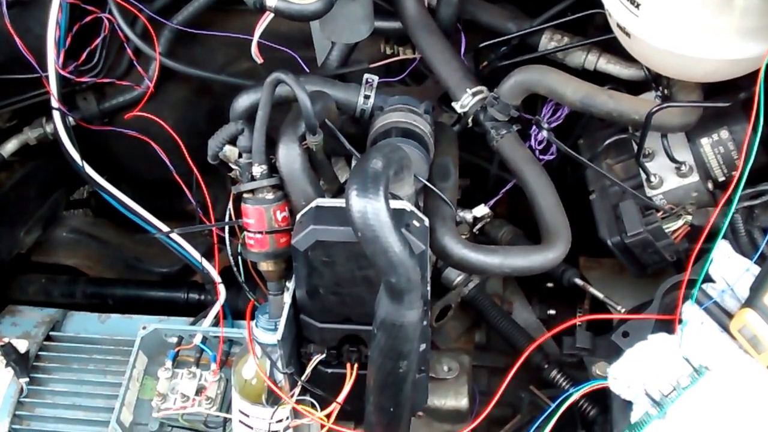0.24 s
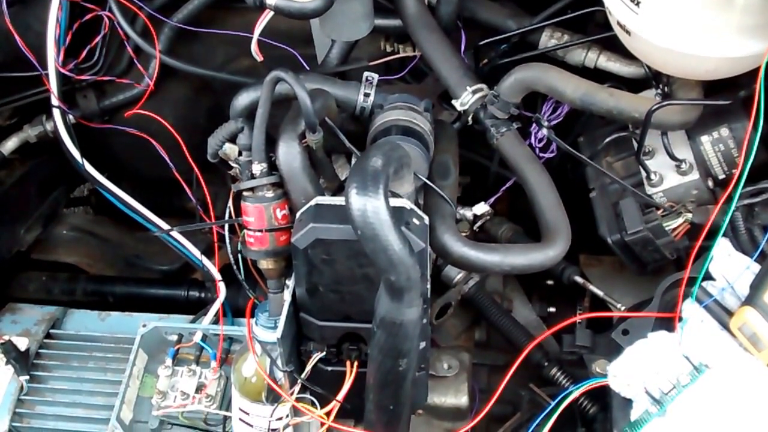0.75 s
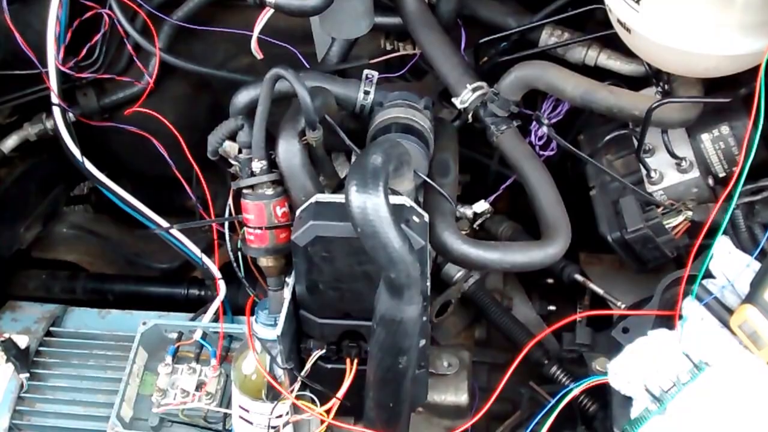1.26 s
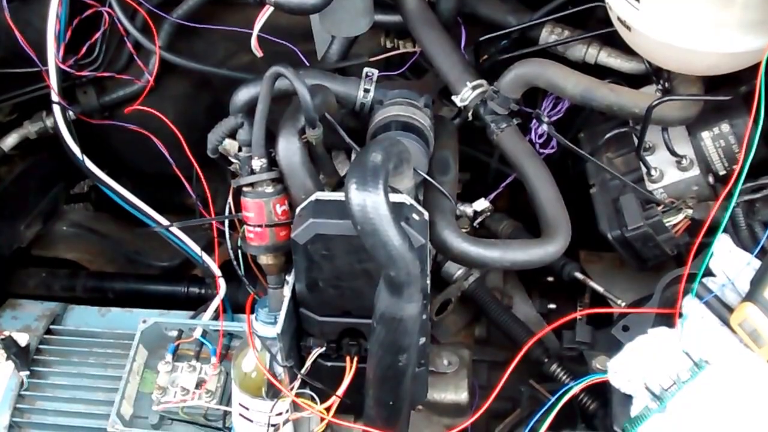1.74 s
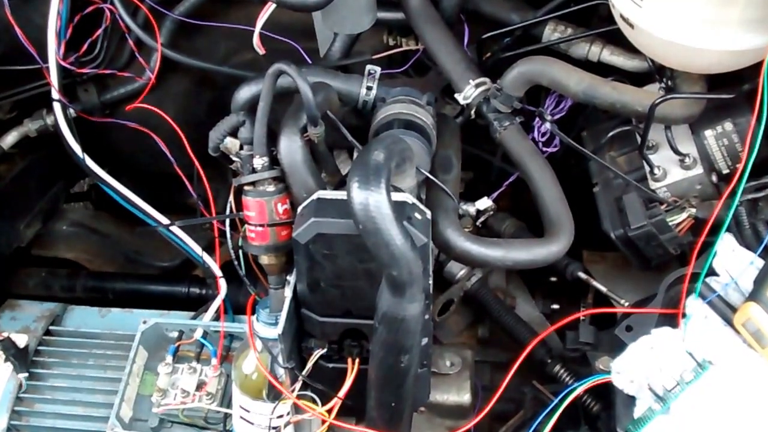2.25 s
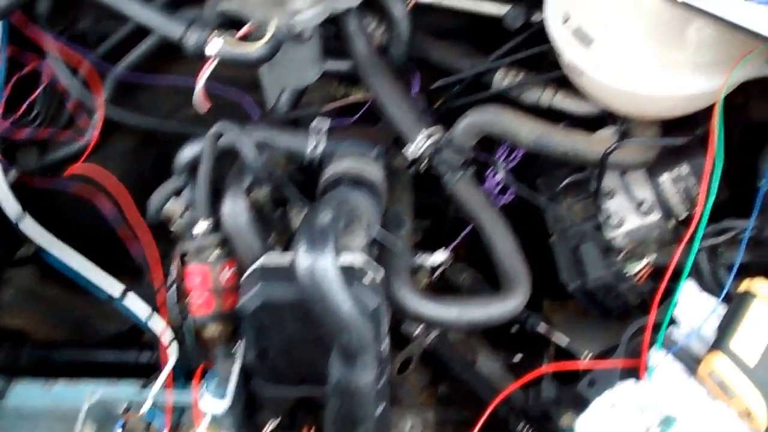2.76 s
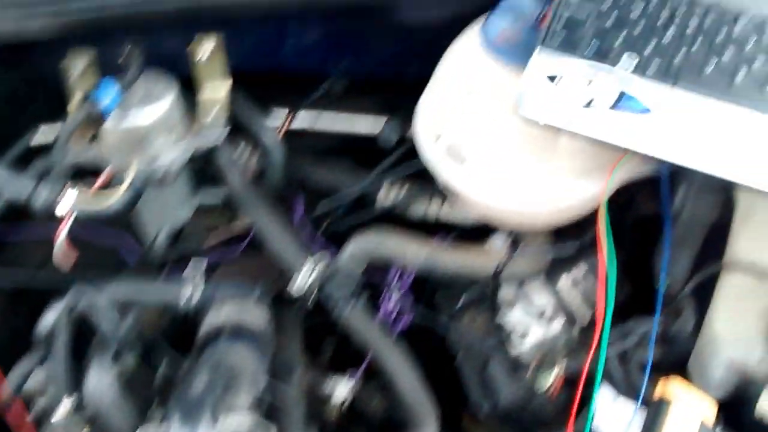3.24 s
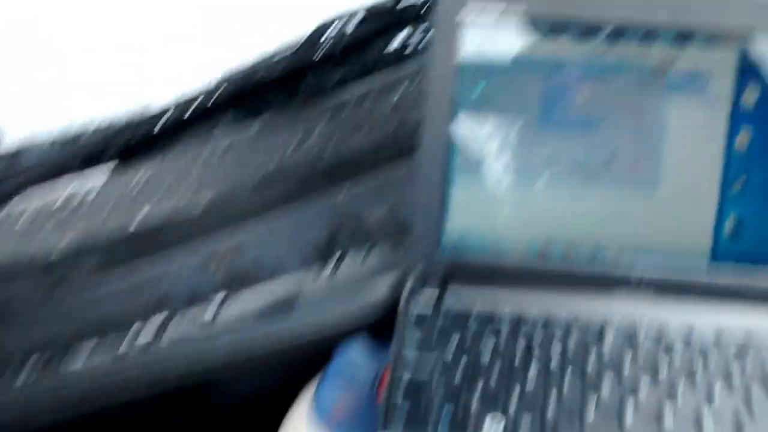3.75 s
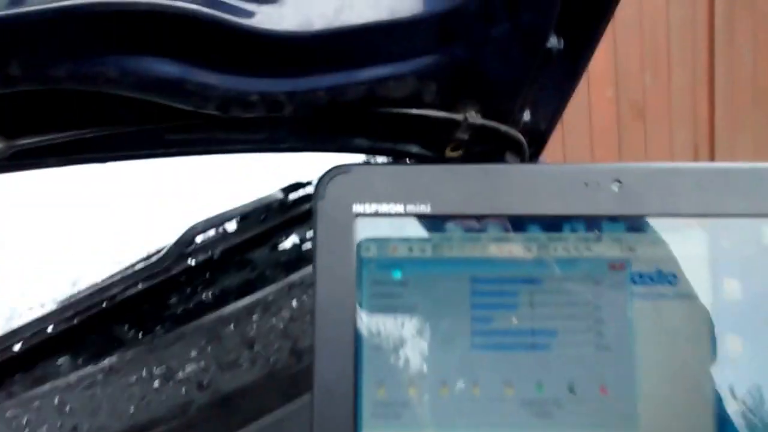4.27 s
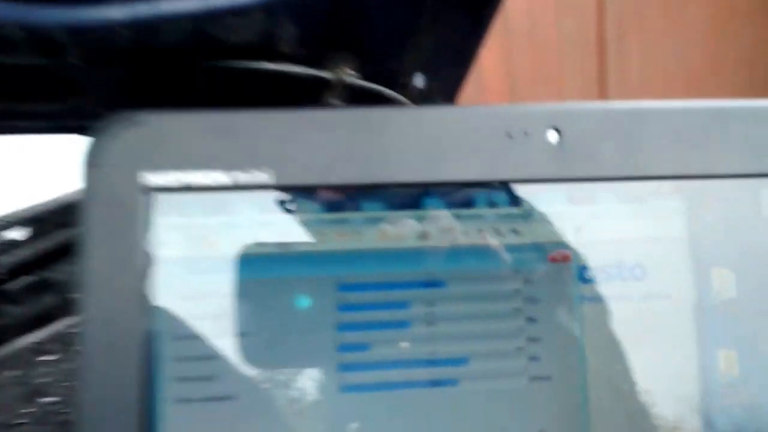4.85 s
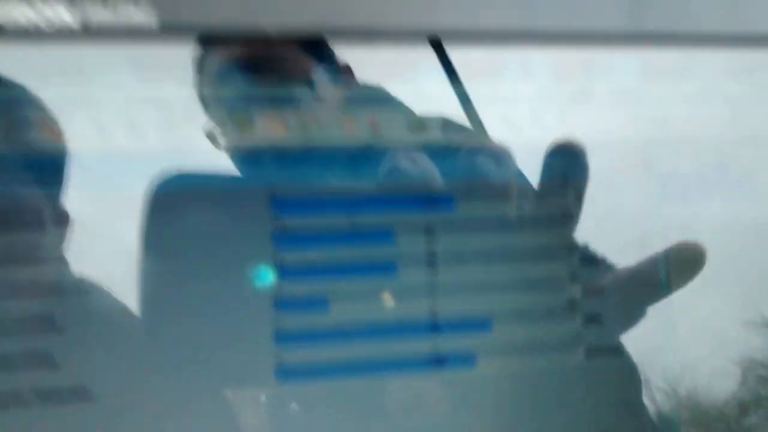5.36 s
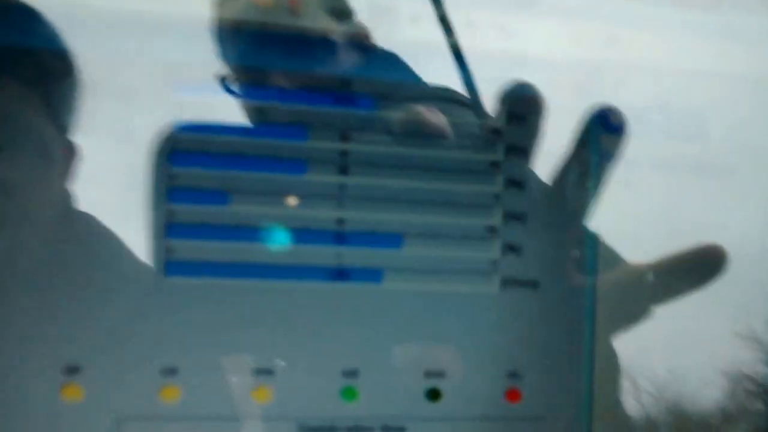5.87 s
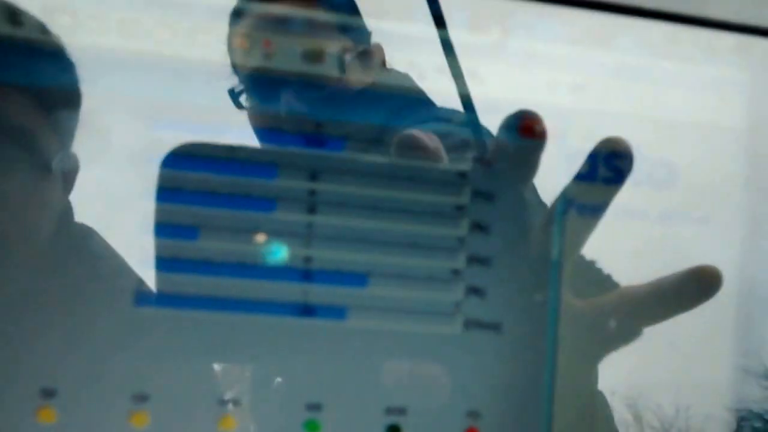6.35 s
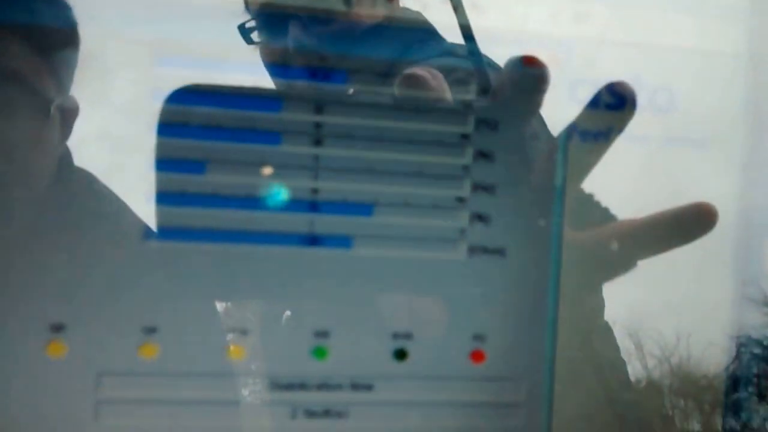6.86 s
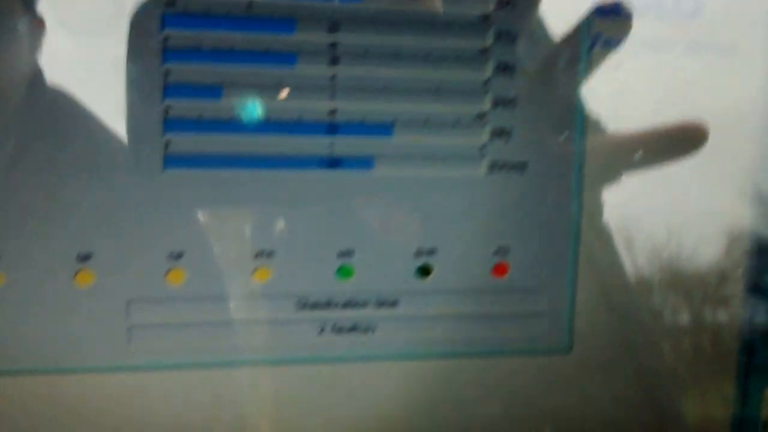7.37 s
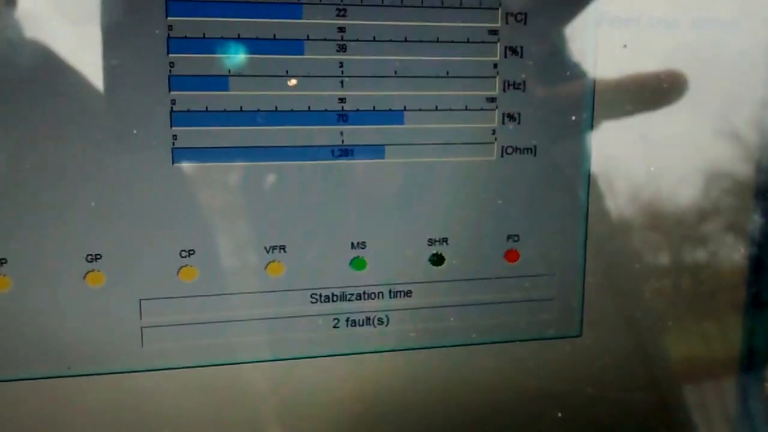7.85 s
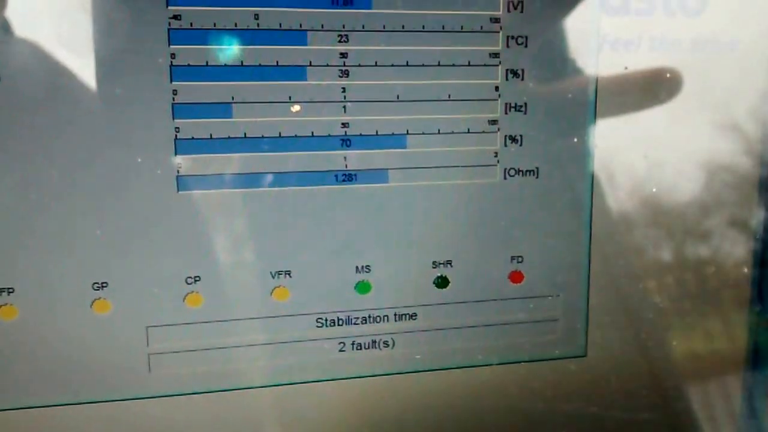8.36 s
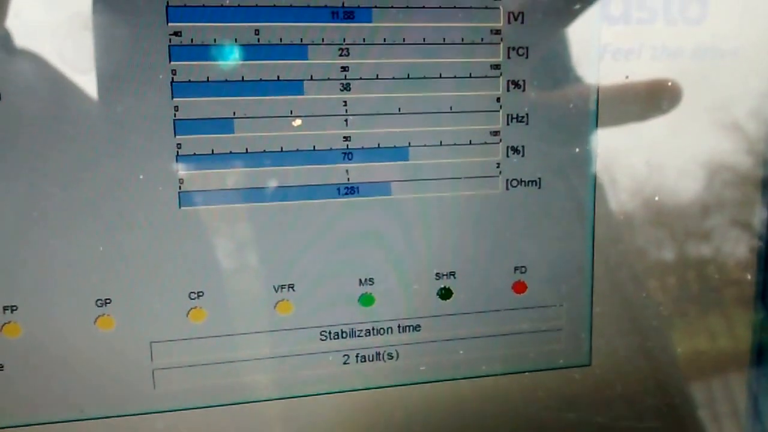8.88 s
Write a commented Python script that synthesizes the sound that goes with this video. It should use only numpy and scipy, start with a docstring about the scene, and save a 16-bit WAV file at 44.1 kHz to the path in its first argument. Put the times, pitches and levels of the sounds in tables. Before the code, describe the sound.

A diesel heater struggles to light, its exhaust pipe hooting in uneven low bursts with puffing flares over steady blower hiss and motor whine.

```python
"""In an open engine bay a diesel heater tries to light: its unsteady flame makes the exhaust pipe hoot in bursts.
The hoot is a near sine with swelling loudness; each flare of the flame is puffing noise around a small pop.
Shaped noise makes the blower's hiss and whistles and the wind on the microphone; steady sines make the motor whine.
The microphone swings from the heater to a spot beside it, which changes levels, tone colour and left-right balance.
Fingers tick on the casing, a thin high whistle and a squeak are heard, and a small bird trills once."""
import sys
import numpy as np
from scipy import signal
from scipy.fft import rfft, irfft, next_fast_len
from scipy.io import wavfile
from scipy.ndimage import uniform_filter1d

SR = 44100
rng = np.random.default_rng(int(sys.argv[2]) if len(sys.argv) > 2 else 0)


def store_wav(level_fs):
    """Save 16-bit WAV to argv[1]."""
    pcm = np.round(np.clip(np.atleast_2d(level_fs), -1, 1) * 32767)
    wavfile.write(sys.argv[1], SR, pcm.T.astype(np.int16))


def ratio(d):
    """dB to gain"""
    e = np.asarray(d, float) / 20
    return 10 ** e


N = 401751   # length in samples

# the microphone turns off the heater, then moves beside it: time_s, turned (0-1), moved (0-1)
SWING = [(0, 0.03, 0.05), (2.5, 0, 0.08), (3.4, 0.33, 0.15), (4.2, 0.95, 0.05), (5.0, 0.98, 0.81),
         (9.11, 1, 1)]
# left-right balance of noise over the heater: pitch_hz, left_minus_right_db
LEAN_OVER = [(60, 3), (150, 1.5), (380, 2), (950, 0.5), (2380, -7), (5980, -3), (15000, 4.5)]
# how far the left side runs ahead in noise: pitch_hz, left_lead_radians
LEAD = [(0, 0.5), (1460, -0.5), (2760, -4), (3360, -5.5), (4050, -5), (4650, -7), (5170, -8.5),
        (5860, -10.5), (6550, -17.5), (7320, -27), (9990, -23), (11500, -13), (15500, -22.5)]
TURNS_HZ = 49.35   # turning rate of the blower

SIZE = next_fast_len(N)
HZ = np.maximum(np.arange(SIZE // 2 + 1) * SR / SIZE, 1)
LEFT_LEAD = np.interp(HZ, *np.transpose(LEAD))


def rms_one(x):
    """Scale to an rms of 1."""
    return x / np.sqrt(np.mean(x ** 2) + 1e-20)


def in_time(rows):
    """Turn rows that begin with a time into one smooth curve per remaining column."""
    s, *columns = np.transpose(rows)
    return [np.interp(np.arange(N) / SR, s, c) for c in columns]


def swing():
    """How far the microphone has turned off the heater and moved beside it, each 0 to 1."""
    return np.clip(in_time(SWING), 0, 1)


def at_hz(points, hz):
    """Read a curve of (pitch, value) points along a logarithmic pitch scale."""
    pitch_hz, value = np.transpose(points)
    return np.interp(np.log(hz), np.log(pitch_hz), value)


def between(start, end, share):
    """Blend from start to end."""
    return start + (end - start) * share


def drift(rate_hz):
    """Slow chance: noise twice through a one-pole low-pass, made at a twentieth of the sample rate; rms 1."""
    r = np.exp(-40 * np.pi * rate_hz / SR)
    slow = signal.lfilter([1], [1, -2 * r, r * r], rng.standard_normal(N // 20 + 4002))[4000:]
    return np.interp(np.arange(N) / 20, np.arange(len(slow)), rms_one(slow))


def band(x, low_hz, high_hz):
    """Keep what lies between two pitches."""
    return signal.sosfilt(signal.butter(2, [low_hz, high_hz], "band", fs=SR, output="sos"), x)


def place(x, lean_db, lag=12):
    """Place a point source: lag samples later on the left, and lean_db louder there."""
    return np.array([np.roll(x, lag) * ratio(lean_db / 2), x * ratio(-lean_db / 2)])


def noise(colour_db, lean_db, alike, lead, white=None):
    """Stereo noise spectra: a shared part, shifted in phase on the left, and a part of each side's own."""
    if white is None:
        white = rng.standard_normal((3, SIZE))
    shared, left, right = rfft(white)
    alike = np.clip(alike, 0, 1)
    ahead = np.exp(1j * lead)
    pair = np.sqrt(alike) * shared * [ahead, ahead ** 0]
    pair = pair + np.sqrt(1 - alike) * np.array([left, right])
    return pair * ratio(colour_db + np.outer([.5, -.5], lean_db))


def sound(spectrum, low_hz, high_hz):
    """Turn spectra into sound, scaled so that the average of the two sides has rms 1 within a band."""
    inside = (HZ > low_hz) & (HZ < high_hz)
    power = 2 * np.sum(abs(spectrum.mean(axis=0)[inside]) ** 2)
    return irfft(spectrum, SIZE)[:, :N] * SIZE / np.sqrt(power)


def hoot():
    """The flame drives the pipe in round swells: a near sine, sharper while growing, with overtones when loud."""
    # swells while the flame holds: top_s, top_db, rise_s, fall_s
    hoots = [(0.019, -8.5, 0.058, 0.029), (0.09, -12.5, 0.05, 0.049), (0.159, -19.5, 0.023, 0.03),
             (0.524, -10.5, 0.082, 0.051), (0.6, -13.5, 0.022, 0.036), (0.654, -12, .05, 0.072),
             (0.759, -9.5, 0.061, 0.045), (0.806, -10, 0.023, 0.11), (0.909, -10, 0.15, 0.07),
             (1.45, -7.5, 0.075, 0.062), (1.54, -10.5, .07, 0.033), (1.887, -7.5, 0.044, 0.097),
             (1.96, -9, 0.095, 0.041), (2.37, -8, .1, 0.1), (2.579, -18.5, .07, 0.039),
             (2.67, -18, .04, 0.015), (2.734, -9, 0.055, 0.041), (2.795, -7.5, 0.027, 0.059),
             (2.849, -9.5, 0.033, 0.047), (3.13, -14, 0.11, 0.077), (3.24, -9, 0.18, 0.1),
             (3.82, -10, 0.057, 0.099), (4.051, -10.5, 0.24, .11), (4.21, -14, 0.053, 0.061),
             (4.35, -10, 0.12, 0.047), (4.433, -11.5, 0.049, 0.044), (4.84, -15.5, 0.083, .05),
             (4.984, -11.5, 0.069, 0.11), (5.343, -14.5, 0.12, 0.1), (5.491, -14, 0.076, 0.052),
             (5.82, -13, 0.025, 0.11), (5.96, -14.5, 0.11, 0.085), (6.132, -15, 0.12, 0.062),
             (6.28, -14, 0.17, 0.056), (6.685, -18, 0.048, .08), (6.77, -13, .03, 0.075),
             (7.002, -11, 0.086, .15), (7.36, -13.5, 0.11, 0.043), (7.822, -12.5, 0.081, 0.13),
             (8.061, -21, 0.023, 0.065), (8.147, -12.5, 0.051, 0.1), (8.262, -24, 0.025, 0.074),
             (8.6, -13.5, 0.073, 0.15), (8.793, -12.5, 0.05, 0.1), (9.029, -16.5, 0.081, 0.24)]
    pipe_hz = 228.06
    rise_roundness, fall_roundness = 1.38, 1.92
    t = np.arange(N) / SR
    power = ratio(-35.5 + 3 * drift(10.3)) ** 2   # the pipe's murmur between hoots
    for s, top_db, rise, fall in hoots:
        near = slice(max(round((s - rise) * SR), 0), round((s + fall) * SR))
        rising = t[near] < s
        off = np.where(rising, (s - t[near]) / rise, (t[near] - s) / fall)
        roundness = np.where(rising, rise_roundness, fall_roundness)
        power[near] += (ratio(top_db) * (1 - np.clip(off, 0, 1) ** roundness)) ** 2
    level_db = uniform_filter1d(10 * np.log10(power), size=450)
    growth = uniform_filter1d(np.gradient(level_db) * SR, size=2000)   # dB a second
    hz = pipe_hz + 3.03 * np.tanh(growth / 150) + 3.3 * drift(9.93)
    phase = 2 * np.pi * np.cumsum(hz) / SR
    size = np.sqrt(2) * ratio(level_db + 1.15 * drift(20) + 0.4 * drift(83))
    turned, moved = swing()
    pair = phase + [between(-0.6, -0.054, moved), 0 * t]   # radians by which left leads
    overtones = np.sin(2 * pair + 1.4) + 0.49 * np.sin(3 * pair) + 0.63 * np.sin(4 * pair)
    overtone_size = 0.04 * size ** 2 * ratio(9.2 * np.tanh(drift(31)))
    tone = size * np.sin(pair) + overtone_size * overtones
    lean_db = between(1.74, 5, turned)
    return tone * ratio(np.outer([.5, -.5], lean_db)), phase


def flares(phase):
    """Flares swell fast and die slower around small pops, roaring in puffs on the pipe's cycle; a few dull clicks."""
    # fuel catches and flares: top_s, level_db (of each swell alone, before the puffs)
    catches = [(0.009, -40.5), (0.524, -42.5), (0.805, -39.5), (1.429, -36), (1.462, -43), (1.876, -35),
               (2.365, -39), (2.789, -35), (3.196, -38.5), (3.793, -39), (4.809, -38.5), (4.954, -41.5),
               (5.295, -37), (5.451, -37.5), (5.817, -34.5), (6.257, -36.5), (6.763, -33.5), (7.004, -31),
               (7.327, -36.5), (7.778, -34.5), (8.149, -35), (8.58, -37), (8.774, -33)]
    # tone colour of the roar: pitch_hz, level_db (per Hz; only the shape counts)
    flare_colour = [(190, -12.5), (320, -2), (390, -20.5), (490, -14), (1040, -28), (1280, -19.5),
                    (2540, -60.5), (3290, -30.5), (6000, -53), (7800, -87.5)]
    # short dull clicks: start_s, peak_db (the loudest sets the scale)
    click_rows = [(.8014, -19), (2.7864, -19), (2.7994, -18), (7.776, -18)]
    rise_s, fall_s = 0.019, 0.048
    pop_db = 11   # peak of the largest pop above the level of the largest flare
    marks = np.zeros(N)
    for s, level_db in catches:
        marks[round(s * SR)] = ratio(level_db)
    before = 2600   # samples of swell ahead of each top
    t = np.arange(-before, 13000) / SR
    shape = np.where(t < 0, np.exp(t / rise_s), np.exp(-t / fall_s))
    swell = signal.fftconvolve(marks, shape)[before:][:N]
    puffs = (1 + .5 * np.cos(phase - .6)) * ratio(1.6 * np.tanh(drift(53)))
    roar = sound(noise(at_hz(flare_colour, HZ), at_hz(LEAN_OVER, HZ), 0.98, LEFT_LEAD), 343, 1800)

    pop = band(marks + 1e-18, 360, 910)
    pop = ratio(pop_db) * pop / abs(pop).max() * marks.max()
    clicks = np.zeros(N) + 1e-18
    for s, peak_db in click_rows:
        clicks[round(s * SR)] = ratio(peak_db)
    dull = band(band(clicks, 400, 1900), 300, 2200)
    dull = dull / abs(dull).max() * clicks.max()
    return place(pop + dull, 0.93) + swell * puffs * roar, swell


def air(swell):
    """Burner roar, duct whistle, blower hiss, fizz and wind from noise; flares lift the whistles, hiss and fizz."""
    # air at the moving microphone before flares lift it: time_s, hiss_db, duct_whistle_db
    air_levels = [(0, -54, -54.5), (0.5, -52.5, -54), (2.0, -52.5, -57), (2.9, -53.5, -53.5),
                  (3.75, -51.5, -57.5), (4.2, -48, -47), (4.85, -44.5, -45), (5.6, -44.5, -55),
                  (6.6, -48.5, -60), (7.4, -47, -63.5), (9.11, -47.5, -52)]
    # noise colour over the heater: pitch_hz, level_db (per Hz; only the shape counts)
    over_colour = [(59, -49.5), (100, -18), (173, -14.5), (238, -4), (370, -27), (898, -28), (1110, -34),
                   (1230, -31.5), (1760, -38.5), (2000, -30.5), (2580, -29), (3850, -32), (9950, -55),
                   (11300, -48.5), (15500, -63)]
    # noise colour beside the heater: pitch_hz, level_db (per Hz; only the shape counts)
    beside_colour = [(59, -53.5), (100, -10.5), (228, -8), (429, -12), (917, -23), (1040, -30.5),
                     (1260, -26), (1800, -42), (2500, -41.5), (2870, -45.5), (3250, -38), (5400, -48.5),
                     (6810, -50.5), (7410, -56.5), (12000, -54), (15500, -66)]
    # left-right balance beside the heater: pitch_hz, left_minus_right_db
    lean_beside = [(60, 2.5), (150, 18), (380, 0), (950, 5), (2380, -8.5), (5980, -5), (15000, 9.5)]
    # resonances of housing and ducts: pitch_hz, width_hz, boost_over_db, boost_beside_db
    body = [(280.4, 29, 2.5, 9), (433, 2.9, 12, -4), (520, 5, 8.5, -1), (610, 3.7, 10, 0),
            (880, 34, 2.5, 6.5), (3080, 22, 4, 12.5), (3310, 70, 3, 6), (11800, 300, 5, 6),
            (3924, 180, 7, 7), (6760, 270, 4.5, 6)]
    # how alike the two sides are: pitch_hz, likeness (0-1)
    likeness = [(100, 1), (250, 0.66), (450, 0.37), (1200, 1), (1800, 0.7), (2600, 0.93), (6000, 0.3),
                (10000, 0.95), (15000, 0.06)]
    # rumble of wind on the microphone: pitch_hz, level_db (per Hz; only the shape counts)
    wind_colour = [(30, -12), (90, -9.5), (190, -9), (300, -55)]
    hiss_db, duct_db = in_time(air_levels)
    moved = swing()[1]
    hiss_swing_db = hiss_db + 51
    # each: level over and beside the heater, plus a share of the hiss's swing
    roar_db = between(-44, -42.5, moved) + 0.28 * hiss_swing_db
    fizz_db = between(-61, -67, moved) + 0.95 * hiss_swing_db
    wind_db = between(-44, -39, moved) + 0.066 * hiss_swing_db

    # shares of power below 1800 Hz and above 5500 Hz
    low, high = 1 / (1 + (HZ / 1800) ** 8), 1 / (1 + (5500 / HZ) ** 8)
    turns = np.arange(SIZE) * TURNS_HZ / SR
    roar, hiss, fizz = 0, 0, 0
    spots = [(over_colour, LEAN_OVER, 1 - moved), (beside_colour, lean_beside, moved)]
    for k, (colour, lean, share) in enumerate(spots):
        white = rng.standard_normal((3, SIZE))
        # part of the noise repeats on every turn
        one_turn = rng.standard_normal(900)
        white[0] += 0.11 * band(one_turn[(turns % 1 * 900).astype(int)], 2200, 4600)
        peaks = 0
        for row in body:
            hz, width_hz, boost_db = row[0], row[1], row[2 + k]
            peaks = peaks + (ratio(boost_db) ** 2 - 1) / (1 + (2 * (HZ - hz) / width_hz) ** 2)
        both = noise(at_hz(colour, HZ), at_hz(lean, HZ), at_hz(likeness, HZ), LEFT_LEAD, white)
        both = both * np.sqrt(np.maximum(1 + peaks, .01))
        roar = roar + np.sqrt(share) * sound(both * np.sqrt(low), 363, 950)
        hiss = hiss + np.sqrt(share) * sound(both * np.sqrt((1 - low) * (1 - high)), 2200, 5000)
        fizz = fizz + np.sqrt(share) * sound(both * np.sqrt(high), 6060, 14000)

    # whistles are noise narrowed around one pitch; the upper one belongs beside the heater
    duct = noise(0, -1.5 + 0 * HZ, 1.0, LEFT_LEAD) / (1 + ((HZ - 1255) / 60) ** 2)
    duct = ratio(duct_db + 1.9 * drift(9.7)) * sound(duct, 1180, 1700)
    upper = noise(0, -4.0 + 0 * HZ, 1.0, LEFT_LEAD) / (1 + ((HZ - 3310) / 30) ** 2)
    upper = ratio(hiss_db - 8.5) * sound(upper, 3000, 3600) * moved ** 2

    turn = 2 * np.pi * turns[:N]
    throb = 1 + 0.06 * np.cos(turn) + 0.066 * np.cos(2 * turn + 1.4)   # brushes rub once a turn
    blower = throb * (ratio(hiss_db + 0.73 * drift(11.0)) * hiss + ratio(fizz_db) * fizz)
    roar = ratio(roar_db + 1.0 * drift(18)) * roar
    wind_lean_db, wind_lead = np.clip(HZ / 3.1 - 5, 0, 9), np.clip(4.5 - HZ / 20, 0, 3)
    wind = sound(noise(at_hz(wind_colour, HZ), wind_lean_db, 0.56, wind_lead), 25, 120)
    wind = ratio(wind_db + 2.2 * drift(5.0)) * wind
    lifted = (1 + 150 * swell) * duct + (1 + 18 * swell) * blower + (1 + 160 * swell) * upper
    return roar + lifted + wind


def motor():
    """The drive whines at a fixed pitch, beating with the turns; blower tones waver with the speed."""
    # whine at the moving microphone, before it wavers: time_s, first_db, left_minus_right_db, third_harmonic_db
    whine_levels = [(0, -52, -3.5, -64.5), (2.4, -51.5, -7.5, -63), (3.2, -50.5, -11.5, -63.5),
                    (3.7, -56, -8.5, -59), (3.95, -53.5, -5.5, -61), (5.7, -51.5, 4.5, -58),
                    (6.6, -54, 6, -76), (7.6, -54, 4.5, -57), (9.11, -54, 7.5, -58.5)]
    # blower tones before they waver: multiple of the turning rate, peak_over_db, peak_beside_db
    orders_of_turn = [(16, -54, -60), (19, -53.5, -53), (60, -62, -70), (64, -66, -60), (67, -66, -59),
                      (76, -68, -60), (79, -62, -59)]
    whine_hz = 1964.4
    first_db, lean_db, third_db = in_time(whine_levels)
    turned, moved = swing()
    # facing the heater, then turned off it: radians by which left leads, and left minus right dB
    lead, third_lead = between(-0.9, 2.6, turned), between(-0.59, -5.5, turned)
    third_lean_db = between(0, -2.5, turned)
    t = np.arange(N) / SR
    first = 0
    for k, size in enumerate([1, .22, .24]):   # the whine and neighbours one and two turning rates above
        first = first + size * np.sin(2 * np.pi * (whine_hz + k * TURNS_HZ) * t + [lead, 0 * t])
    third = np.sin(6 * np.pi * whine_hz * t + [third_lead, 0 * t])
    first = ratio(first_db + 1.0 * drift(8.0) + np.outer([.5, -.5], lean_db)) * first
    third = ratio(third_db + 2.0 * drift(2.8) + np.outer([.5, -.5], third_lean_db)) * third
    whine = np.sqrt(2) * (first + third)

    turns = TURNS_HZ * (t + np.cumsum(0.0028 * drift(6)) / SR)
    orders = 0
    for k, over_db, beside_db in orders_of_turn:
        level = ratio(between(over_db, beside_db, moved) + 4.1 * drift(3.3))
        orders = orders + level * np.sin(2 * np.pi * (k * turns + rng.random()))
    return whine + orders * ratio([[-2.5], [2.5]])   # blower tones lean to the right


def ticks():
    """Dry snaps, each a tiny burst of noise, with a dull knock of the casing; faint crackles as the grip shifts."""
    # fingers on the casing: start_s, snap_peak_db, knock_db (scales the knock), left_minus_right_db
    taps = [(5.453, -31, -27, -8), (5.604, -31, -24, -8.5), (5.8321, -9, -18, -7), (5.9285, -22, -20, -5),
            (5.9691, -21, -20, -6), (6.094, -15, -11, -7)]
    # ringing of the casing: pitch_hz, level_db (relative), decay_s (to fall 60 dB)
    casing = [(900, -2, .005), (1900, 0, .004), (4400, 1, .0025), (6500, -1, .002)]
    rustle_start_s, rustle_end_s, rustles_per_s, rustle_db = 5.38, 5.8, 90, -41
    out, t = np.zeros((2, N)), np.arange(600) / SR
    for s, snap_db, knock_db, lean_db in taps:
        burst = np.roll(rng.choice([-1, 1], len(t)) * ratio(-60 * t / .001), 14)
        snap = band(burst, 600, 12000)
        snap = ratio(snap_db) * snap / abs(snap).max()
        knock = sum(ratio(db - 60 * t / decay_s) * np.sin(2 * np.pi * hz * t) for hz, db, decay_s in casing) / 2
        knock = ratio(knock_db) * np.roll(knock, 14)
        at = round(s * SR) + 20
        out[:, at:at + len(t)] += place(snap + knock, lean_db, lag=18)
    now = np.arange(N) / SR
    born = (rng.random(N) < rustles_per_s / SR) & (now > rustle_start_s) & (now < rustle_end_s)
    strength = ratio(rustle_db + 4.2 * np.minimum(rng.exponential(1, N), 4))
    crackle = band(born * strength + 1e-18, 7500, 13000)
    return out + place(crackle, -9.5)


def peep():
    """A thin high whistle beside the heater: a near sine that wavers in pitch and level."""
    # before it wavers: time_s, pitch_hz, level_db
    peep_rows = [(0, 11690, -94), (5.6, 11750, -85), (5.95, 11700, -71), (7.0, 11900, -62),
                 (7.6, 11800, -68), (7.9, 11600, -79), (8.3, 11600, -66), (9.11, 11600, -70)]
    hz, level_db = in_time(peep_rows)
    size = np.sqrt(2) * ratio(level_db + 3.0 * drift(25))
    phase = 2 * np.pi * np.cumsum(hz + 25.0 * drift(30)) / SR
    return place(size * np.sin(phase), 1.5)


def squeak():
    """A faint, short, high sine that flutters and dies away."""
    start_s, length_s, pitch_hz, peak_db = 5.265, .12, 13200, -59
    u = np.clip((np.arange(N) / SR - start_s) / length_s, 0, 1)
    size = ratio(peak_db + 3.0 * drift(40)) * np.sin(np.pi * np.sqrt(u))
    return place(size * np.sin(2 * np.pi * pitch_hz * length_s * u), 0.0)


def bird():
    """Falling whistles, trilled by a 120 Hz flutter in loudness, with a short echo."""
    # notes: start_s, top_hz, end_hz, length_s, level_db (before trill and echo)
    notes = [(7.513, 8060, 7000, 0.045, -53), (7.554, 8300, 6900, 0.043, -50),
             (7.593, 7950, 6800, 0.04, -47)]
    out = np.zeros(N)
    for s, top_hz, end_hz, length_s, level_db in notes:
        u = np.arange(round(length_s * SR)) / (length_s * SR)
        slur = np.sin(2 * np.pi * np.cumsum(top_hz + (end_hz - top_hz) * u) / SR)
        trill = 1 + 0.44 * np.sin(2 * np.pi * 120.0 * length_s * u)
        out[round(s * SR):][:len(u)] += ratio(level_db) * np.sin(np.pi * u) ** 0.4 * slur * trill
    return place(out + 0.43 * np.roll(out, 700), 5.3)   # echo after 700 samples


def scene():
    """Add up all the sources; the pipe's cycle puffs the flares, and the flares lift the air sounds."""
    pipe, phase = hoot()
    roar, swell = flares(phase)
    return pipe + roar + air(swell) + motor() + ticks() + peep() + squeak() + bird()


def gain_control(x):
    """Low-pitched peaks over the ceiling pull the gain down quickly, dB for dB; it creeps back slowly."""
    ceiling_db, clamp_s, recover_db_per_s = -7, 0.0033, 6
    ramp = recover_db_per_s * np.arange(N) / SR
    peak_db = 20 * np.log10(abs(band(x, 30, 1600)).max(axis=0) + 1e-9)
    over = np.maximum(peak_db - ceiling_db, 0)
    held = np.maximum(np.maximum.accumulate(over + ramp) - ramp, 0)
    r = np.exp(-1 / (clamp_s * SR))
    return x * ratio(-signal.lfilter([1 - r], [1, -r], held))


def top_cut(x):
    """Nothing passes above the cut-off."""
    return signal.sosfilt(signal.butter(12, 15600, fs=SR, output="sos"), x)


def record(dry):
    """Hold down the loud low-pitched peaks and finish the mix."""
    mix = gain_control(dry)
    return top_cut(mix)


dry = scene()
out = record(dry)
store_wav(out)
```